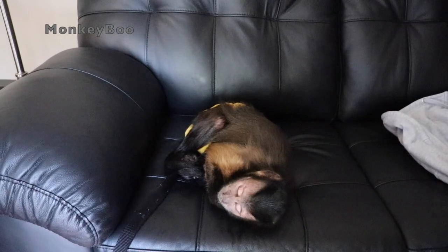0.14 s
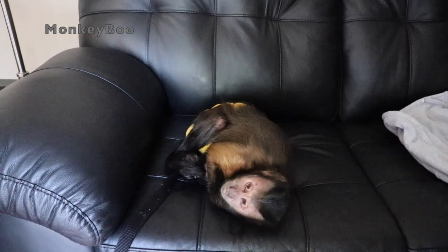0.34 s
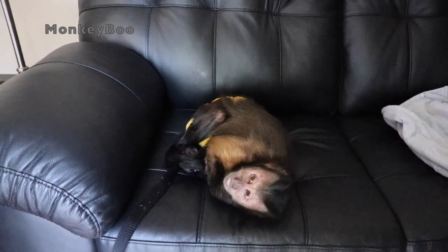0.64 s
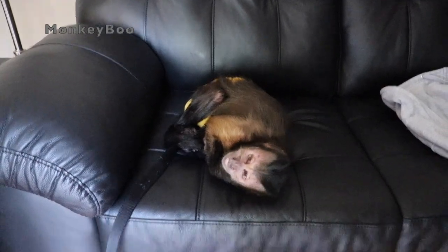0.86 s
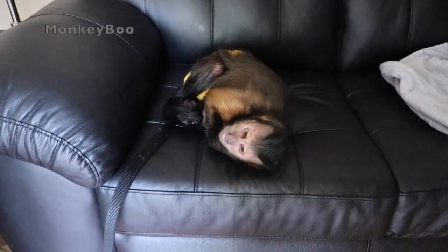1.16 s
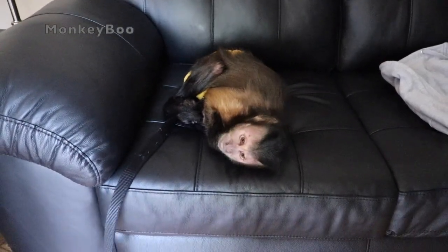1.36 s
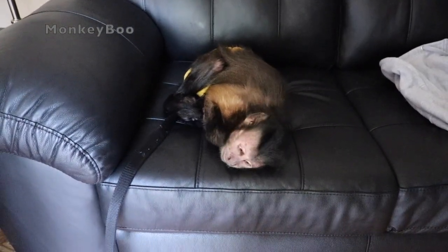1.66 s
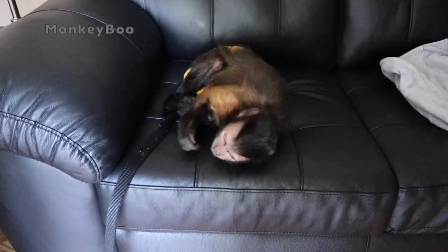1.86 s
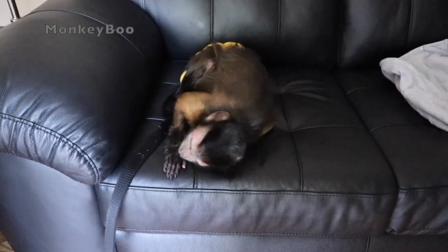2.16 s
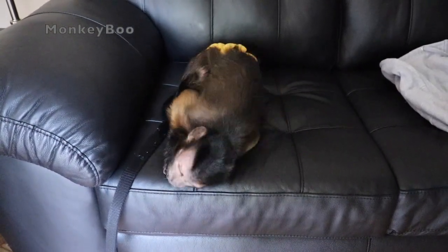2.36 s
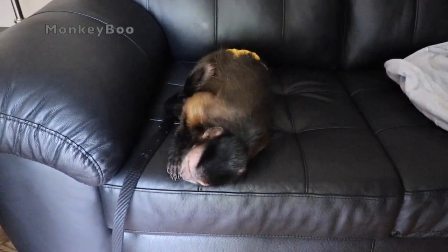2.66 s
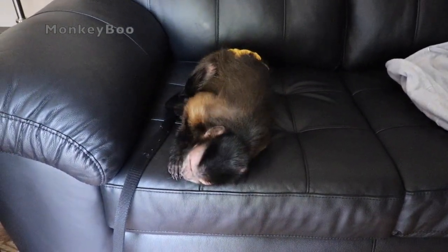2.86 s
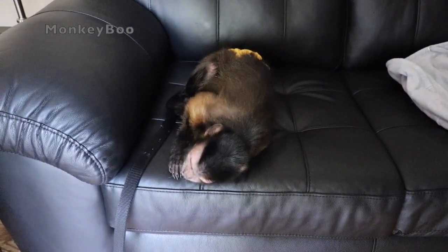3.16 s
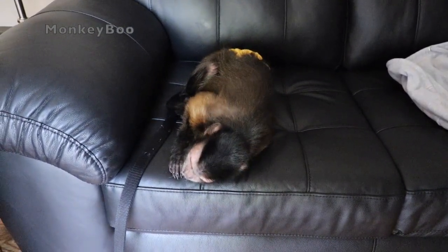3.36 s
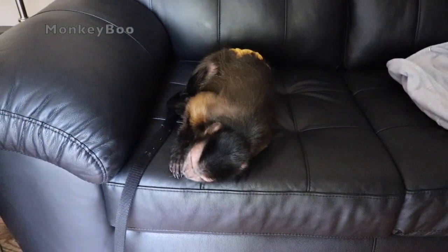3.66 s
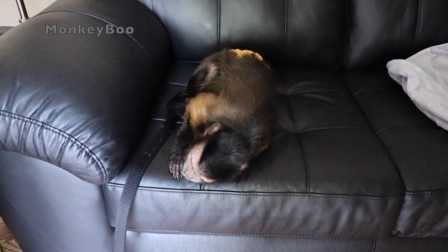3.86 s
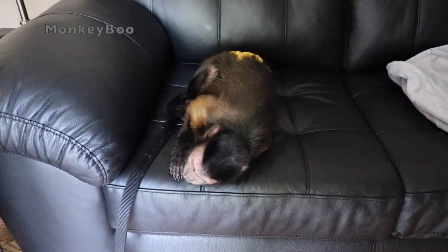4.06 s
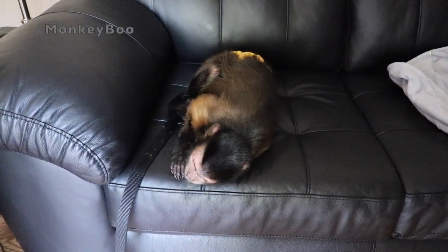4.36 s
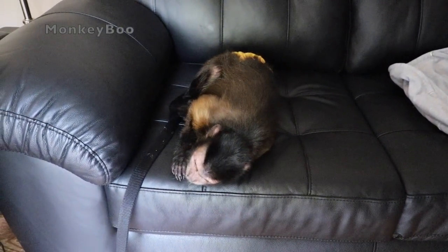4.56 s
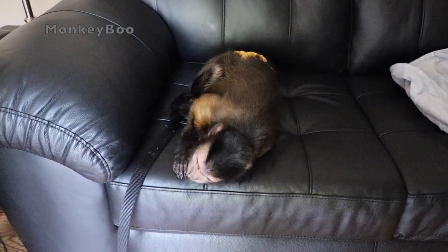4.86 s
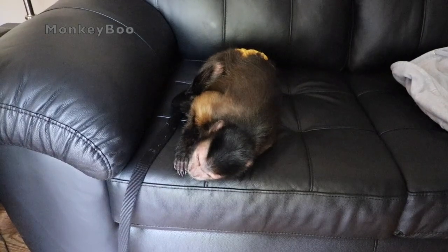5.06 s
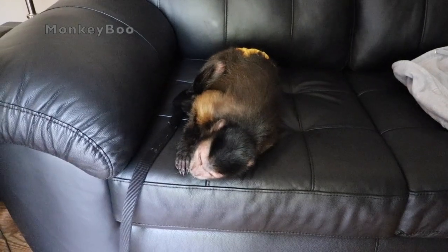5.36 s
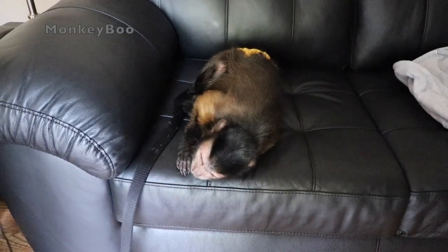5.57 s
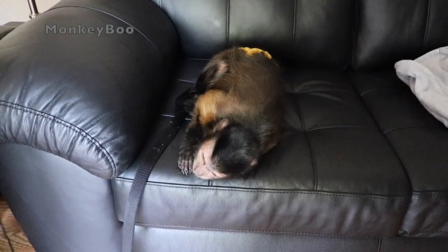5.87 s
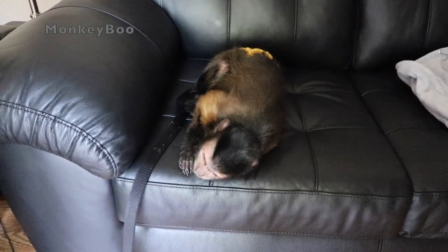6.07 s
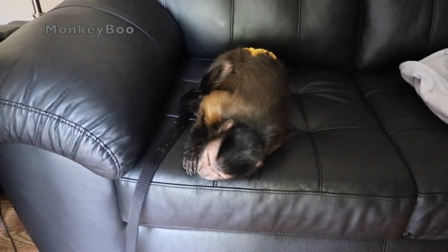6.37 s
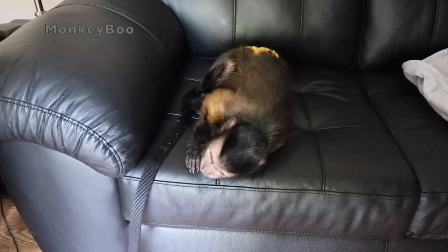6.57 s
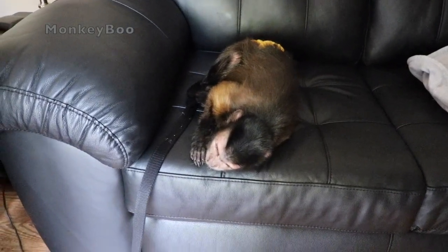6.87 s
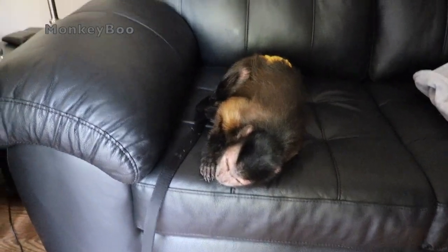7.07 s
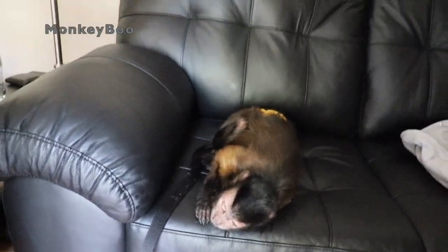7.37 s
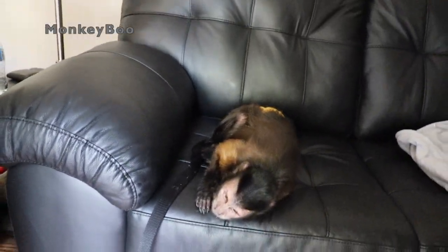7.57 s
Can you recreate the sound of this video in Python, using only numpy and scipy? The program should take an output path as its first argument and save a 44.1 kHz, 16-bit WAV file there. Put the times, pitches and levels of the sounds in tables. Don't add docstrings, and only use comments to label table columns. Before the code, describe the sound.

A small monkey on a leather sofa squeaks close to a stereo microphone in a lively room. Three wavering calls come first, then a breathy sinking sigh as it rolls over, two arched squeaks, and three more spaced calls, the last high and held. Tiny lip and claw ticks and faint brushing on leather sit between. Another animal whistles rising steps far away midway and again near the end, over soft hum.

```python
import sys
import numpy as np
from scipy import signal
from scipy.fft import rfft, irfft, next_fast_len
from scipy.io import wavfile
from scipy.ndimage import uniform_filter1d, map_coordinates

SR = 44100
rng = np.random.default_rng(int(sys.argv[2]) if len(sys.argv) > 2 else 0)


def makeup_ratio(level_db):
    decades = np.asarray(level_db, float) / 20
    return 10 ** decades


def wrap_up_sound(samples):
    columns = np.atleast_2d(samples).T
    tamed = np.clip(columns, -1, 1)
    steps = np.round(tamed * 32767).astype(np.int16)
    wavfile.write(sys.argv[1], SR, steps)


N = 340452

# (time [s], pitch [Hz])
FACING = [
    [(-.03, 1297), (0.0, 1276), (0.024, 1366), (0.049, 1256), (0.075, 1363), (0.105, 1399), (0.156, 1252),
     (0.177, 1272)],
    [(0.643, 1275), (0.715, 1214), (0.765, 1372), (0.804, 1342), (0.866, 1495), (0.902, 1432),
     (0.945, 1464), (1.066, 1320), (1.126, 1150)],
    [(1.471, 1566), (1.487, 1520), (1.534, 1284), (1.554, 1296), (1.598, 1444), (1.657, 1228),
     (1.711, 1272), (1.77, 1065)],
]
# (time [s], pitch [Hz])
ROLLING = [
    [(2.165, 1337), (2.179, 1335), (2.197, 1200), (2.234, 1080), (2.329, 947), (2.45, 810)],
]
# (time [s], pitch [Hz])
TURNING = [
    [(2.622, 1596), (2.656, 1326), (2.684, 1355), (2.725, 1552), (2.769, 1523), (2.825, 1661),
     (2.918, 1349), (2.94, 1306)],
    [(3.479, 1265), (3.55, 1230), (3.602, 1376), (3.66, 1351), (3.715, 1505), (3.818, 1228), (3.84, 1165)],
]
# (time [s], pitch [Hz])
TUCKED = [
    [(4.629, 1135), (4.67, 1075), (4.708, 1065), (4.762, 1166), (4.82, 1115), (4.842, 1125), (4.895, 1045),
     (4.922, 905)],
    [(5.685, 1163), (5.72, 1129), (5.765, 1146), (5.818, 1348), (5.858, 1293), (5.925, 1326), (6.0, 1444),
     (6.03, 1425), (6.116, 1275)],
    [(6.865, 1215), (6.945, 1195), (6.99, 1465), (7.085, 1592), (7.125, 1564), (7.165, 1600), (7.205, 1542),
     (7.255, 1560), (7.322, 1397)],
]
# (level [dB], fundamental [dB], second partial [dB], opening flutter [share], closing drop [share])
CALL_LEVELS = [(-3.5, -1, -8.5, 0.00077, 0.085), (-1.5, -1.5, 2.5, 0.019, .19),
               (-1, -1.5, 1.5, 0.013, 0.13), (-2.5, 0, -4, 0.012, 0.079), (2.5, -3.5, -7.5, 0, 0.172),
               (-5.5, 0.5, -1.5, 0.032, 0.15), (-2, -7, 1.5, 0.028, 0.2), (-0.5, -6.5, -2.5, 0.017, 0.02),
               (3.5, -7.5, -7, 0.016, 0)]
# (nasal ring [dB], sizzle [dB], fall per partial above the fifth [dB])
CALL_SHINE = [(-60.5, -58, -1.5), (-50.5, -78, 1), (-83, -69, 1), (-55.5, -68, -34), (-61.5, -59, -12.5),
              (-65.5, -68, -11), (-57, -90, -2.5), (-60, -100, 2), (-56.5, -77, -4)]
# (frequency [Hz], level [dB])
MOUTHS = [
    [(2500, -32.5), (3000, -29), (3600, -26), (4200, -16), (4900, -29), (5500, -20.5), (5900, -24),
     (6400, -39.5)],
    [(2000, -30.5), (2700, -27.5), (3200, -38.5), (4000, -21.5), (4600, -30.5), (5500, -34), (6500, -58)],
    [(2200, -19), (2700, -25), (3100, -20.5), (3600, -30.5), (4150, -21.5), (5000, -30.5), (5800, -31.5),
     (7000, -38)],
    [(2300, -32), (3000, -22.5), (3450, -23.5), (3900, -39.5), (4400, -33.5), (4900, -45), (5600, -56),
     (6500, -57.5)],
]
# (breath under partial 4 [dB], roughness of upper partials [rad])
BREATHINESS = [
    (-37, .33),
    (-26, .9),
    (-34, .35),
    (-31, .22),
]
# (left-right of partial 1 [dB], of upper partials [dB], room [dB], unsteadiness [ratio])
PLACES = [
    (0, -3, -7.5, 1.025),
    (0, -4, -7, 1.4),
    (1.2, -3.5, -8.5, 1.1),
    (0.8, -2.5, -8, 0.61),
]
# (frequency [Hz], level [dB])
FUNDAMENTAL_COLOUR = [(800, -43.5), (1000, -28.5), (1200, -20.5), (1390, -26), (1520, -21.5), (1680, -19)]
# (frequency [Hz], level [dB])
THROAT = [(5600, 0), (7200, -6), (8700, -12), (12000, -22), (16000, -27)]
# (frequency [Hz], level [dB])
NASAL_RING = [(6000, -9), (7600, -5), (8800, -16), (10400, 0), (11400, -2), (12300, -22)]
# (frequency [Hz], level [dB])
SIZZLE = [(9000, -20), (12000, -3), (13500, 0), (16000, 2)]
# (frequency [Hz], density [dB])
BREATH = [(500, -60), (1500, -3), (4000, 5), (6000, -39), (9000, -11), (11000, -28), (16000, -39)]
# (frequency [Hz], t60 [s])
ROOM = [(800, 0.42), (2000, 0.34), (5000, 0.36), (9000, 0.47), (15000, 0.032)]
# (time [s], length [s], first pitch [Hz], last pitch [Hz], level [dB])
GROAN = (5.54, .25, 119, 152, -51)
# (time [s], spread [s], level [dB])
RUSTLES = [
    (1, 1.2, -66),
    (2.35, .2, -60),
    (3.3, .2, -63),
    (6.45, .05, -64),
    (7.3, .6, -63),
]
# (time [s], peak level [dB], centre [Hz], t60 [s])
TICKS = [(.4475, -32.5, 8070, 0.0069), (0.5733, -31, 3800, 0.00334), (1.4406, -29, 7200, 0.0047),
         (3.192, -36.5, 7600, 0.0043), (3.405, -34, 2500, 0.0047), (3.427, -38, 8500, 0.0025),
         (7.25, -35, 1990, .015), (7.382, -31.5, 5500, 0.0024), (7.49, -37, 5950, 0.0019),
         (4.576, -42, 2980, 0.006), (5.617, -40, 2950, 0.007), (6.654, -45, 1010, 0.026),
         (6.799, -41, 3080, 0.0063), (7.6046, -25, 6360, 0.002)]
# (start [s], end [s], pitch [Hz], rise [Hz], level [dB])
FAR_NOTES = [
    (3.09, 3.162, 2520, 30, -52),
    (3.157, 3.233, 2840, 31, -44),
    (3.261, 3.309, 3040, 69, -44.5),
    (3.31, 3.401, 3220, 116, -44.5),
    (3.403, 3.444, 3300, 165, -49),
    (3.447, 3.496, 3600, 20, -55),
    (7.515, 7.634, 2306, 55, -52),
    (7.642, 7.717, 2780, 35, -46),
]
# (frequency [Hz], width [Hz], level [dB])
HUM = [(48, 7.9, -112.5), (116.8, 27, -59), (200, 10, -65), (237, 20, -63), (291, 9.5, -63),
       (358.5, 15, -66)]
# (frequency [Hz], density [dB])
AIR = [(12, -35), (20, -4.5), (210, -6.5), (485, -5), (1000, -10), (2750, -15), (4940, -18.5),
       (16000, -28.5)]
# (frequency [Hz], left-right likeness [ratio])
AIR_LIKENESS = [(60, 0.94), (180, 0.42), (550, 0.74), (1650, 0.16), (4970, 0.085), (15000, 0.043)]


def unit(x):
    return x / np.sqrt(np.mean(x ** 2) + 1e-20)


def along(points, hz):
    f, v = np.transpose(points)
    return np.interp(np.log(hz + 1), np.log(f + 1), v)


def wobble(rate, size):
    knots = rng.standard_normal(int(size * rate / SR) + 4)
    return map_coordinates(knots, [np.arange(size) * rate / SR])


def glide(t, s, hz):
    slope = np.diff(hz) / np.diff(s)
    before, after = slope[:-1], slope[1:]
    same = before * after > 0
    inner = np.where(same, 2 * before * after / np.where(same, before + after, 1), 0)
    m = np.r_[slope[0], inner, slope[-1]]
    i = np.clip(np.searchsorted(s, t) - 1, 0, len(s) - 2)
    h = np.diff(s)[i]
    u = np.clip((t - s[i]) / h, 0, 1)
    step = (hz[i + 1] - hz[i]) * u * u * (3 - 2 * u)
    bend = h * u * (1 - u) * (m[i] * (1 - u) - m[i + 1] * u)
    return hz[i] + step + bend


def coloured(gain, size):
    m = next_fast_len(size)
    spectrum = rfft(rng.standard_normal((2, m)))
    return irfft(spectrum * gain(np.fft.rfftfreq(m, 1 / SR)), m)[:, :size]


def echo(x, gap, alike):
    hz, t, z = signal.stft(rng.standard_normal((2, SR // 2)), SR, nperseg=256)
    decay = makeup_ratio(-60 * t / along(ROOM, hz)[:, None])
    tail = signal.istft(z * decay, SR, nperseg=256)[1][:, :SR // 2]
    tail = tail[0] + np.array([[1], [-1]]) * (1 - alike) * tail[1]
    late = np.pad(x, (round(gap * SR), 0))[None]
    return signal.fftconvolve(late, tail / np.linalg.norm(tail[0]), axes=1)


def add(out, x, s):
    part = out[:, round(s * SR):][:, :x.shape[1]]
    part += x[:, :part.shape[1]]


def call(pitch, levels, shine, mouth, breathiness, pan_db, shaky):
    level_db, fundamental_db, second_db, flutter, drop = levels
    ring_db, sizzle_db, fall_db = shine
    breath_db, rough = breathiness
    s, hz = np.transpose(pitch)
    t = np.arange(s[0] - .008, s[-1] + .003, 1 / SR)
    age, size = t - s[0], len(t)

    fading = np.clip(4 * (1 - age / .1), 0, 1)
    waver = flutter * np.cos(2 * np.pi * (age / .046 - .15)) * fading
    held = glide(t, s, hz) * (1 + waver)
    closing = 1 - drop * np.clip(1 + (t - s[-1]) / .015, 0, 1) ** 2
    f0 = held * closing * (1 + .003 * wobble(60, size) + .0012 * wobble(400, size))
    phase = 2 * np.pi * np.cumsum(f0) / SR

    slack = np.maximum(np.log2(1150 / held), 0)
    effort = makeup_ratio(-12 * slack)
    tense = makeup_ratio(23.5 * np.log2(held / held.mean()))
    push_db = level_db + .5 * np.exp(-np.abs(age) / .039)

    def through(k):
        colour_db = along(mouth, k * f0) + along(THROAT, k * f0) + fall_db * max(k - 5, 0)
        return effort ** k * makeup_ratio(push_db + colour_db)

    def strength(k):
        if k == 1:
            return makeup_ratio(push_db + fundamental_db + along(FUNDAMENTAL_COLOUR, held))
        if k == 2:
            return makeup_ratio(second_db) * through(2)
        if k < 5:
            return through(k)
        thin = makeup_ratio(ring_db + along(NASAL_RING, k * f0)) + makeup_ratio(sizzle_db + along(SIZZLE, k * f0))
        return (through(k) + thin * effort ** 2) * tense

    onset = np.clip((t - t[0]) / .0102, 0, 1)
    close = np.clip((t[-1] - t) / .011, 0, 1)
    sides = np.array([[1], [-1]])
    voice = np.zeros((2, size))
    for k in range(1, 14):
        unsteady = makeup_ratio(shaky * min(1.86 + .5 * k, 3.6) * wobble(50.82, size))
        rise = onset ** (2 + 2 * k)
        blur = (rough + 2 * slack) * min(k / 6, 1.3) ** 2 * wobble(500, size)
        lead = min(.04 + .091 * k, .85) * wobble(12.5, size) * sides
        pan = makeup_ratio(pan_db[min(k - 1, 1)] * sides / 2)
        wave = np.cos(k * phase + .5 * k * k + blur + lead) * (k * f0 < SR / 2)
        voice += np.sqrt(2) * strength(k) * unsteady * rise * pan * wave

    breath = unit(coloured(lambda f: makeup_ratio(along(BREATH, f)), size)) * (1 + .77 * np.cos(phase))
    puff = makeup_ratio(-8 - 60 * np.maximum(age, 0) / .012) * through(3)
    leak = makeup_ratio(breath_db + 35 * slack) * through(4)
    return (voice + (leak + puff) * breath * onset ** 4) * close, t[0]


def monkey():
    lead_in = .1
    out = np.zeros((2, N + SR))
    rows = zip(CALL_LEVELS, CALL_SHINE)
    postures = zip([FACING, ROLLING, TURNING, TUCKED], MOUTHS, BREATHINESS, PLACES)
    for pitches, mouth, breathiness, (*pan_db, room_db, shaky) in postures:
        for pitch in pitches:
            voice, s = call(pitch, *next(rows), mouth, breathiness, pan_db, shaky)
            add(out, voice, s + lead_in)
            add(out, makeup_ratio(room_db) * echo(voice.mean(0), gap=.0055, alike=.33), s + lead_in)
    return out[:, round(lead_in * SR):][:, :N]


def ticks():
    dry, t = np.zeros((1, N)), np.arange(SR // 20) / SR
    for s, db, hz, t60 in TICKS:
        crack = uniform_filter1d(rng.standard_normal(len(t)), size=3)
        ring = np.sin(2 * np.pi * hz * t)
        add(dry, makeup_ratio(db - 60 * t / t60) * (ring + .26 * crack)[None], s)
    return .95 * dry + makeup_ratio(-7) * echo(dry[0], gap=.006, alike=.19)[:, :N]


def sofa():
    t = np.arange(N) / SR
    s, length, first_hz, last_hz, groan_db = GROAN
    u = np.clip((t - s) / length, 0, 1)
    phase = 2 * np.pi * np.cumsum(first_hz + (last_hz - first_hz) * u) / SR
    groan = makeup_ratio(groan_db) * np.sin(np.pi * u) ** 2 * np.sqrt(2) * np.sin(phase)
    brush = unit(coloured(lambda f: 1 / (1 + ((f - 5500) / 2500) ** 4), N))
    strokes = sum(makeup_ratio(db) * np.exp(-.5 * ((t - at) / spread) ** 2) for at, spread, db in RUSTLES)
    return groan + strokes * brush


def far_whistle():
    out = np.zeros((2, N))
    for start, end, hz, rise_hz, db in FAR_NOTES:
        t = np.arange(0, end - start, 1 / SR)
        pitch = (hz + rise_hz * t / t[-1]) * (1 + .019 * wobble(165.3, len(t)))
        phase = 2 * np.pi * np.cumsum(pitch) / SR
        edge = np.clip(np.minimum(t, t[-1] - t) / .01, 0, 1)
        level = makeup_ratio(db + 5 + 2.5 * wobble(62, len(t))) * edge
        note = level * (np.sin(phase) + makeup_ratio(-11.5) * np.sin(2 * phase))
        add(out, makeup_ratio(-6) * np.array([note, note]), start)
        add(out, makeup_ratio(-.5) * echo(note, gap=.0037, alike=.1), start)
    return out


def household():
    def air_gain(f):
        turn = np.arccos(np.clip(along(AIR_LIKENESS, f), -1, 1)) / 2
        return makeup_ratio(along(AIR, f)) * [np.cos(turn), np.sin(turn)]

    mid, side = coloured(air_gain, N)
    air = makeup_ratio(-51.5) * unit(np.array([mid + side, mid - side]))
    tones = np.zeros(N)
    for hz, width, db in HUM:
        tones += makeup_ratio(db) * unit(coloured(lambda f: 1 / (1 + (2 * (f - hz) / width) ** 2), N)[0])
    rumble = unit(coloured(lambda f: 1 / (1 + ((f - 125) / 45) ** 4), N)[0])
    swell_db = 3 * wobble(2.59, N) + 2.5 * wobble(3.4, N)
    return air + tones + makeup_ratio(-61.5 + swell_db) * rumble


def scene():
    return monkey() + ticks() + sofa() + far_whistle() + household()


def low_pass(x):
    return signal.sosfilt(signal.butter(12, 16270, fs=SR, output="sos"), x)


def record(dry):
    m = next_fast_len(N)
    passed = np.fft.rfftfreq(m, 1 / SR) < 15700
    mix = irfft(rfft(dry, m) * passed, m)[:, :N]
    return low_pass(mix)


dry = scene()
out = record(dry)
wrap_up_sound(out)
```